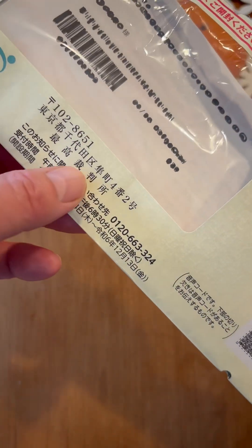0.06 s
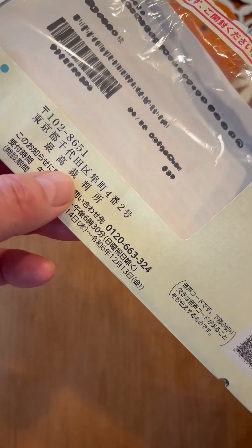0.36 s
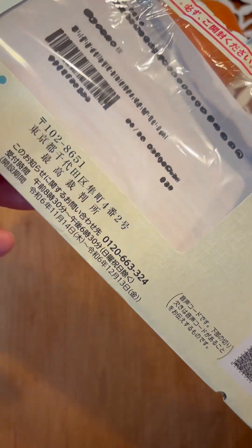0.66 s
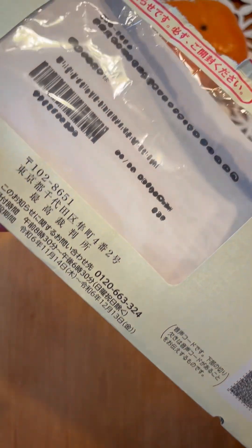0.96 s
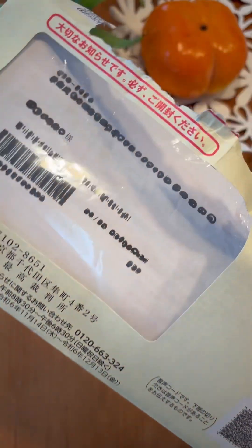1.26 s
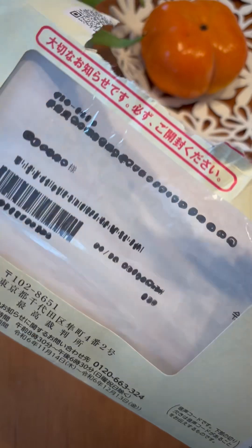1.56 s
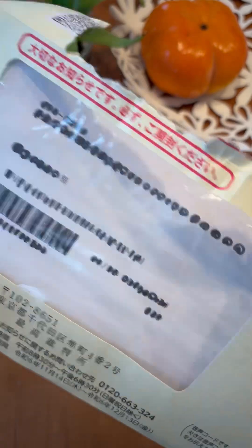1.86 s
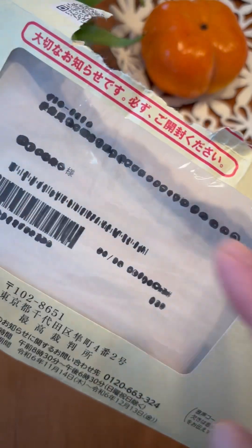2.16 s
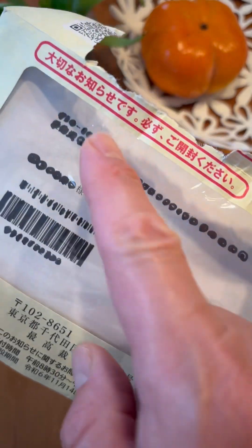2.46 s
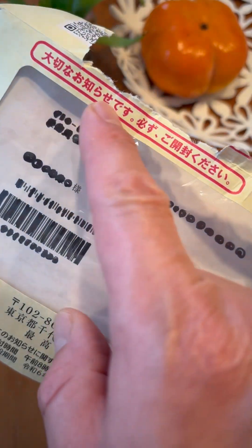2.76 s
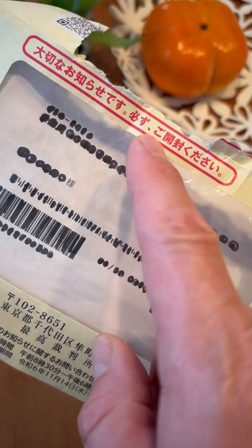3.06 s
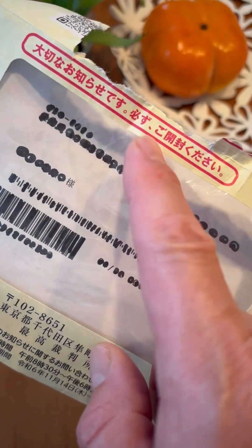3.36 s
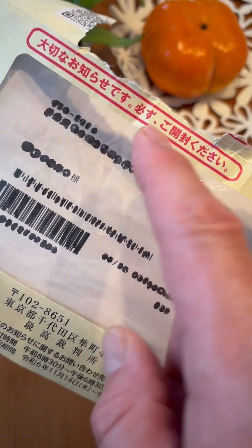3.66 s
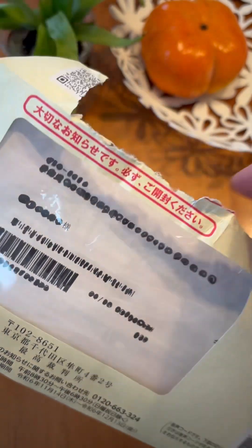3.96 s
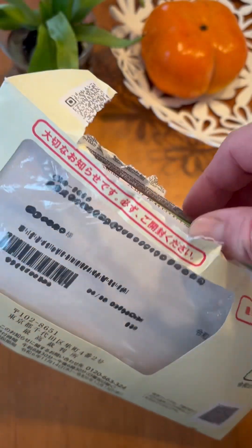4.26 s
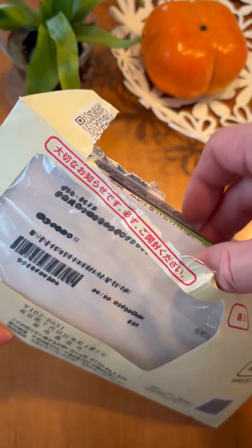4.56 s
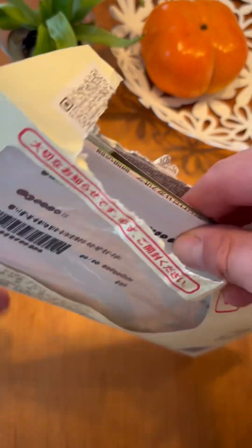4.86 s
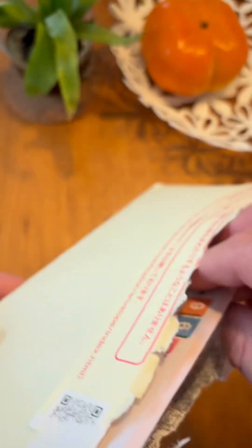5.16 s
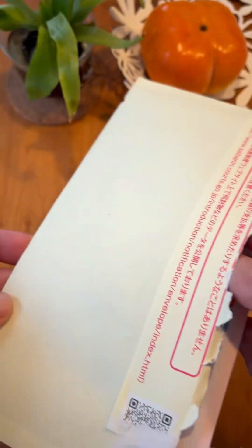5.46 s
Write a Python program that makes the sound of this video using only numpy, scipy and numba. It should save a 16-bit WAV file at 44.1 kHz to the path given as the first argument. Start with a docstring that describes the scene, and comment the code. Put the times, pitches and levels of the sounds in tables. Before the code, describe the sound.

In a small, quiet room with a low appliance hum, an opened window envelope is handled close to the microphone. A few faint crackles come first, then two brief spells of sharper crinkling as fingers press the paper and plastic film. Finally paper scrapes against paper and crackles more loudly as the letter is drawn from the envelope, easing off into a few light ticks.

```python
"""A torn window envelope crinkles as hands flex it over a table, press its plastic window and work the
letter out. Each crinkle is a buckling fold: an avalanche of fibre snaps that excites the sheet.
Between crinkles paper rubs on paper by stick-slip friction; the faces flop and ring the air pocket,
and the open mouth resonates. An appliance hums and buzzes in the small room, and a phone with two
microphones picks up the sound a hand's length away."""
import sys
import numpy as np
from scipy import signal
from scipy.fft import rfft, irfft
from scipy.io import wavfile
from numba import njit

SR = 44100
rng = np.random.default_rng(int(sys.argv[2]) if len(sys.argv) > 2 else 0)


def to_wav(s):
    """Save 16-bit WAV."""
    ch = np.atleast_2d(s).T  # columns
    pcm = np.round(np.clip(ch, -1, 1) * 32767)  # PCM
    wavfile.write(sys.argv[1], SR, pcm.astype(np.int16))


N = 242550
TIME = np.arange(N) / SR
TOP_HZ = 12000

# noise spectrum of the room: f/Hz, density level/dB (in a 1 Hz band)
ROOM_SPECTRUM = [(25, -102), (50, -83), (70, -91.5), (100, -70), (130, -80), (180, -84), (320, -86.5),
                 (500, -96), (1100, -104), (2200, -102.5), (3300, -112.4), (6000, -119), (9000, -117),
                 (11000, -134)]
# mains and fan tones of the appliance: f/Hz, rms level/dB
HUM_TONES = [(50, -84.5), (100.5, -61), (151, -67.5), (226.7, -59.5)]
# harmonics of the motor's rotation: harmonic number, level/dB
MOTOR_HARMONICS = [(27, -79.5), (28, -87), (29, -73.5), (30, -79), (31, -80), (32, -69), (33, -77),
                   (35, -82), (36, -87), (37, -84), (38, -86), (39, -83.5), (42, -75.5), (43, -93)]
# slow gain applied to those harmonics: t/s, gain/dB
BUZZ_GAIN = [(0.1, 0.5), (0.7, 1), (1.15, 1), (2.3, 1), (3.3, 2.5), (3.95, 1.5), (4.4, 5.5), (5.4, 3.5)]
# direct sound at the two microphones: f/Hz, phase lead of the left/rad, left minus right/dB
MIC_DIFFERENCES = [(200, -1.5, 7), (740, -0.3, -2.5), (1690, -0.59, -1), (2720, 2, -3.2), (3780, 1.74, -3),
                   (4600, 1.8, -2.5), (5010, 0.46, 1.5), (5200, 1.5, -3), (5750, 3, 0), (6450, 3.3, 1),
                   (7180, 5.5, -0.5), (8780, 6.5, 0.5), (10100, 9.25, -1), (11500, 9.5, -0.5)]
# radiation spectrum of the sheet: f/Hz, relative level/dB
SHEET_SPECTRUM = [(330, -14), (600, -5), (850, -4.5), (1150, -1.5), (1700, 2), (2400, -1.5), (3500, -1),
                  (4400, -1), (5600, -2.5), (7600, -3), (9600, -4), (10900, -4), (12000, -6.5)]
# the envelope's mouth as it is pried open and let go: t/s, opening (0-1), slit resonance f/Hz
MOUTH_SHAPE = [(1.9, 0.12, 1820), (2.5, 0.37, 3500), (2.9, 0.48, 5100), (3.5, 1, 4250), (4.1, 0.5, 3630),
               (4.3, 0.5, 3450), (4.55, 0.9, 3520), (4.59, 0.2, 4180), (4.66, 0.7, 3650), (4.72, 1, 3540),
               (4.79, 0, 4330), (4.94, 0.02, 5300), (5.05, 0, 4900), (5.3, 0, 2260), (5.42, 0.6, 2130)]
# modes of the faces and the air pocket between them: nominal f/Hz, relative level/dB, t60/s
POCKET_MODES = [(320, -4.5, 0.09), (372, -3.5, 0.049), (495, -4, 0.024), (640, -9, 0.024),
                (785, -2.5, 0.038), (1010, -4, 0.0092), (1480, 4, 0.012)]
# a broad face flops in or out: t/s, level/dB
FACE_FLOPS = [(1.446, -62), (1.545, -56.5), (1.691, -60), (1.862, -63), (2.874, -55.5), (4.097, -54.5),
              (4.142, -60), (4.24, -64), (4.472, -57), (4.526, -59), (4.573, -53.5), (4.587, -54),
              (4.703, -60), (4.936, -53.5), (4.947, -52.5), (5.258, -58)]
# fingers and sheets slide: start t/s, duration/s, level/dB, treble over body/dB
RUB_STROKES = [(0.524, 0.21, -66, 31), (0.669, 0.073, -61, -7), (1.133, 0.16, -64.5, 10),
               (1.412, 0.16, -53.5, -2), (1.639, 0.17, -53, 0), (1.853, 0.18, -53.5, 2.5),
               (2.542, 0.096, -62.5, -1.5), (2.862, 0.17, -56.5, 8), (4.08, 0.083, -44.5, 8),
               (4.203, 0.17, -47.5, 10.5), (4.37, 0.19, -66, 7), (4.514, 0.1, -43.5, 1),
               (4.531, 0.45, -48.5, 12.5), (4.888, 0.069, -42.5, 18), (4.999, 0.16, -47.5, 12.5),
               (5.105, 0.037, -44, 8.5), (5.16, 0.29, -60.5, -18)]
# brightness of the spot handled, crisp at the window, dull on the back: t/s, tilt/(dB per octave)
SPOT_TILT = [(0.1, -0.7), (0.8, -0.9), (1, -0.7), (1.45, 1), (2.03, -1.4), (2.37, -1.5), (2.88, 3),
             (3.13, -0.3), (3.8, 1), (4.1, 0.3), (4.37, 1), (4.475, -4), (4.53, -0.14), (5.05, 2),
             (5.26, -2.5), (5.4, -3.6)]
# folds of paper and window film buckle: peak t/s, level/dB, swell time/s
BUCKLES = [(0.082, -52.5, 0.006), (0.158, -46, 0.009), (0.209, -44.5, 0.0075), (0.279, -50, 0.0065),
           (0.292, -52, 0.0074), (0.329, -48.5, 0.0081), (0.394, -46.5, 0.0048), (0.405, -48.5, 0.0072),
           (0.439, -54, 0.01), (0.805, -49.5, 0.013), (1.006, -53, 0.0058), (1.376, -52, 0.011),
           (1.421, -38.5, 0.0043), (1.449, -38.5, 0.0094), (1.477, -34, 0.0044), (1.526, -37.5, 0.008),
           (1.546, -41.5, 0.0068), (1.59, -50, 0.0048), (1.605, -40.5, 0.0049), (1.647, -54.5, 0.0052),
           (1.686, -37.5, 0.0076), (1.703, -46, 0.0043), (1.739, -49, 0.0049), (1.773, -41.5, 0.011),
           (1.795, -49, 0.0037), (1.865, -39, 0.0065), (1.901, -44, 0.012), (1.929, -43.5, 0.0046),
           (1.972, -46, 0.0064), (2.027, -47, 0.0046), (2.369, -54.5, 0.0045), (2.712, -43, 0.0057),
           (2.753, -53, 0.009), (2.86, -36.5, 0.004), (2.876, -37, 0.012), (2.892, -37, 0.0056),
           (2.909, -38.5, 0.011), (2.936, -29, 0.0038), (3.004, -39.5, 0.0055), (3.095, -39.5, 0.011),
           (3.12, -41.5, 0.0084), (3.257, -54, 0.0091), (3.303, -56, 0.0085), (3.448, -57, 0.0057),
           (3.515, -48, 0.007), (3.539, -50, 0.0062), (3.804, -46, 0.0094), (4.098, -35, 0.0046),
           (4.145, -36, 0.0075), (4.206, -43, .004), (4.23, -39.5, 0.01), (4.247, -31.5, 0.0041),
           (4.285, -38, 0.0045), (4.369, -42.5, 0.0047), (4.478, -55, 0.0052), (4.527, -26, 0.0055),
           (4.541, -28, 0.0038), (4.55, -24.5, 0.0017), (4.559, -29.5, 0.0056), (4.582, -29.5, 0.01),
           (4.664, -36, 0.012), (4.702, -31.5, 0.0083), (4.73, -35.5, 0.011), (4.791, -34, 0.011),
           (4.866, -33, 0.006), (4.927, -34, 0.0041), (4.938, -29, 0.0097), (4.951, -31.5, 0.0079),
           (5.076, -40, 0.0087), (5.138, -46, 0.02), (5.266, -55, 0.004), (5.318, -55.5, 0.006),
           (5.354, -54.5, 0.0049), (5.404, -43, 0.0057), (5.462, -54.5, 0.014)]


def amp(db):
    """Amplitude ratio of a level in decibels."""
    return 10 ** (np.asarray(db) / 20)


def unit_rms(x):
    """Normalisation to rms 1."""
    return x / np.sqrt(np.mean(x ** 2))


def wander(length, step):
    """Interpolated noise of spread about 1, with a new value every step points."""
    knots = rng.standard_normal(length)
    return np.sqrt(3 / 2) * np.interp(np.arange(length) / step, np.arange(length), knots)


def spectrum_db(points, size):
    """Spectral envelope: (f/Hz, level/dB) points joined on a log axis, for each transform bin."""
    hz, db = np.transpose(points)
    return np.interp(np.log(np.fft.rfftfreq(size, 1 / SR) + 1), np.log(hz), db)


def minimum_phase(x, gain_db):
    """Causal filter with the given gain in each bin, obtained by folding the cepstrum."""
    cepstrum = irfft(np.log(amp(gain_db)), len(x))
    cepstrum[1:len(x) // 2] *= 2
    cepstrum[len(x) // 2 + 1:] = 0
    return irfft(rfft(x) * np.exp(rfft(cepstrum)), len(x))


def steep_lowpass(x, hz):
    """Elliptic filter: a sharp cut above hz."""
    return signal.sosfilt(signal.ellip(10, .2, 80, hz, fs=SR, output="sos"), x)


def gentle_pass(x, hz, side):
    """Second-order filter that passes the "low" or "high" side of hz."""
    return signal.sosfilt(signal.butter(2, hz, side, fs=SR, output="sos"), x)


@njit
def resonate(x, hz, width_hz):
    """Damped resonator with a movable centre frequency, at which its gain is 1."""
    out, band, low = np.empty(len(x)), 0., 0.
    for i in range(len(x)):
        tuning, damping = np.tan(np.pi * hz[i] / SR), width_hz / hz[i]
        velocity = (band + tuning * (x[i] - low)) / (1 + tuning * (tuning + damping))
        band, low = 2 * velocity - band, low + 2 * tuning * velocity
        out[i] = damping * velocity
    return out


def snaps(length, per_second, spread_db):
    """Poisson impulses of either sign, many small and a few large; rms 1."""
    hit = rng.random(length) < per_second / SR
    strength = amp(spread_db * np.minimum(rng.exponential(size=length), 4))
    return unit_rms(hit * strength * rng.choice([-1, 1], length))


def room_noise(incoherent_hz=900):
    """Diffuse rumble and hiss: coherence between the microphones falls as frequency rises."""
    mid, side = rfft(rng.standard_normal((2, N))) * amp(spectrum_db(ROOM_SPECTRUM, N)) * np.sqrt(SR / 2)
    width = np.minimum(np.fft.rfftfreq(N, 1 / SR) / incoherent_hz, 1) ** 2.17
    return irfft(np.array([mid + width * side, mid - width * side]) / np.sqrt(1 + width ** 2), N)


def appliance_hum(waver_db=0.5, waver_per_second=5):
    """Forced vibration by mains and fan: low wavering tones, alike at both microphones."""
    out = np.zeros(N)
    for hz, db in HUM_TONES:
        peak = np.sqrt(2) * amp(db + waver_db * wander(N, SR / waver_per_second))
        out += peak * np.sin(2 * np.pi * (hz * TIME + rng.random()))
    return out


def motor_buzz(turn_hz=62.84, casing_hz=2010, dispersion=0.383, drift=0.000517, waver_db=1.8):
    """Periodic excitation: each turn rings the casing in a short sweep of phase-locked harmonics."""
    out = np.zeros((2, N))
    turns = turn_hz * np.cumsum(1 + drift * wander(N, SR / 9)) / SR
    mic_phase = np.array([[.5], [-.5]])
    for harmonic, db in MOTOR_HARMONICS:
        # the casing passes higher harmonics a little later
        phase = 2 * np.pi * harmonic * turns - dispersion * (harmonic - casing_hz / turn_hz) ** 2
        peak = np.sqrt(2) * amp(db + waver_db * wander(N, SR / 5))
        out += peak * np.sin(phase + mic_phase)
    return out * amp(np.interp(TIME, *np.transpose(BUZZ_GAIN)))


def reverberation(x, t60=0.018, level_db=-32):
    """Exponential decay of a furnished room's diffuse field, different at each microphone."""
    t = TIME[:SR // 2]
    tail = rng.standard_normal((2, len(t))) * amp(-60 * t / t60)
    tail /= np.sqrt(np.sum(tail ** 2, axis=1, keepdims=True))
    return amp(level_db) * signal.fftconvolve(x[None], tail, axes=1)[:, :N]


def early_reflections(x, level_db=-8, delays_s=(0.000837, 0.006), sway_s=0.000275, paths=8):
    """Multipath interference: short paths by way of hands and table shift as the paper moves."""
    dulled = gentle_pass(x, 4800, "low")  # the hands absorb treble
    out = np.zeros((2, N))
    for channel in out:
        for mean_delay in rng.uniform(*delays_s, paths):
            delay = mean_delay + sway_s * wander(N, SR / 7)
            channel += rng.choice([-1, 1]) * np.interp(TIME - delay, TIME, dulled)
    return amp(level_db) * out / np.sqrt(paths)


def direct_sound(x):
    """Diffraction: the phone's body delays and shades each microphone according to frequency."""
    hz, lead, balance_db = np.transpose(MIC_DIFFERENCES)
    bins = np.fft.rfftfreq(N, 1 / SR)
    half_lead = np.exp(1j * np.interp(bins, hz, lead) / 2)
    ratio = amp(np.interp(bins, hz, balance_db))
    response = np.array([ratio * half_lead, 1 / half_lead]) * np.sqrt(2 / (1 + ratio ** 2))
    return irfft(rfft(x) * response, N)


def mouth_resonance(x, slit_db=3, hollow_db=-1, hollow_hz=370.):
    """Resonance: the slit adds bite at a moving pitch, the hollow adds body; both grow as it opens."""
    times, openings, slit_hz = np.transpose(MOUTH_SHAPE)
    opening = np.interp(TIME, times, openings)
    slit = resonate(x, np.interp(TIME, times, slit_hz), width_hz=900.)
    hollow = resonate(x, np.full(N, hollow_hz), width_hz=220.)
    slit_gain = amp(slit_db) * opening
    return (x + slit_gain * slit + amp(hollow_db) * opening * hollow) / np.sqrt(1 + slit_gain / 2)


def flops(push_s=0.0082, detune=0.13, size=8192):
    """Modal ringing: a short uneven push excites the hollow envelope, tuned anew by each bend."""
    t = TIME[:size]
    out = np.zeros(N + size)
    for start_s, db in FACE_FLOPS:
        stretch = 1 + detune * rng.uniform(-0.95, 1)
        pocket = sum(amp(mode_db - 60 * t / t60) * np.sin(2 * np.pi * hz * stretch * t)
                     for hz, mode_db, t60 in POCKET_MODES)
        push = rng.standard_normal(size) * t * np.exp(-2 * t / push_s)
        knock = signal.fftconvolve(push, pocket)[:size]
        start = int(start_s * SR)
        out[start:start + size] += amp(db) * knock / np.std(knock[:size // 8])
    return out[:N]


def band_powers(db, treble_db):
    """Division of a rub's power between body and treble, conserving the sum."""
    treble_ratio = amp(2 * treble_db)
    return amp(2 * db) * np.array([[1], [treble_ratio]]) / (1 + treble_ratio)


def sliding(catch_db=1.5, catch_per_second=110, split_hz=3500, flatness=6.2):
    """Stick-slip friction: fibres catch and let go while each stroke rises, holds and tapers off."""
    power = band_powers(-78.5, treble_db=6) * np.ones(N)  # the holding fingers never keep quite still
    for start_s, duration, db, treble_db in RUB_STROKES:
        from_middle = np.abs(2 * (TIME - start_s) / duration - 1)
        power += band_powers(db, treble_db) * np.exp(-from_middle ** flatness)
    body_gain, treble_gain = np.sqrt(power)
    slips = snaps(N, per_second=18000, spread_db=2.6)
    rub = steep_lowpass(minimum_phase(slips, spectrum_db(SHEET_SPECTRUM, N)), hz=10000)
    body, treble = gentle_pass(rub, split_hz, "low"), gentle_pass(rub, split_hz, "high")
    strokes = body_gain * unit_rms(body) - treble_gain * unit_rms(treble)
    return strokes * amp(catch_db * wander(N, SR / catch_per_second))


def crinkle(swell_s, tilt_db, facet_db, size, facet_spacing_hz=240, pivot_hz=4000, onset_lift_db=0.5):
    """Buckling: an avalanche of snaps swells to its peak and dies away, ringing a facet of the sheet."""
    from_peak = (np.arange(size) - size // 2) / SR / swell_s
    force = np.where(from_peak < -0.73, amp(onset_lift_db), 1) / np.cosh(from_peak)
    hz = np.fft.rfftfreq(size, 1 / SR)
    # random resonances, weaker below 2800 Hz: a facet is too small to ring in the low mids
    facet = facet_db * np.minimum(hz / 2800, 1) * wander(len(hz), facet_spacing_hz * size / SR)
    tilt = tilt_db * np.log2(np.clip(hz, 850, 9000) / pivot_hz)
    avalanche = force * snaps(size, per_second=8000, spread_db=2.5)
    burst = minimum_phase(avalanche, spectrum_db(SHEET_SPECTRUM, size) + tilt + facet)
    return unit_rms(steep_lowpass(burst, TOP_HZ)) * np.sqrt(np.mean(force ** 2))


def crinkles(firm_db=-47.5, hardening=0.2, facet_growth=0.09, size=8192):
    """Nonlinear excitation: a harder buckle is brighter and rings its facet more."""
    out = np.zeros(N + 2 * size)
    for peak_s, db, swell_s in BUCKLES:
        excess_db = db - firm_db
        tilt_db = hardening * excess_db + np.interp(peak_s, *np.transpose(SPOT_TILT))  # per octave
        facet_db = max(2.1 + facet_growth * excess_db, 0)
        start = int(peak_s * SR) + size // 2
        out[start:start + size] += amp(db) * crinkle(swell_s, tilt_db, facet_db, size)
    return out[size:size + N]


def scene():
    """Superposition of the paper's direct and reflected sound on the background of a quiet room."""
    rustle = mouth_resonance(crinkles() + sliding())
    paper = gentle_pass(rustle + flops(), 208, "high")  # a small sheet radiates no deep bass
    foreground = direct_sound(paper) + early_reflections(paper) + reverberation(paper)
    return foreground + room_noise() + appliance_hum() + motor_buzz()


def record(dry):
    """Band limiting: the phone cuts the highest treble."""
    return steep_lowpass(dry, TOP_HZ)


dry = scene()
out = record(dry)
to_wav(out)
```